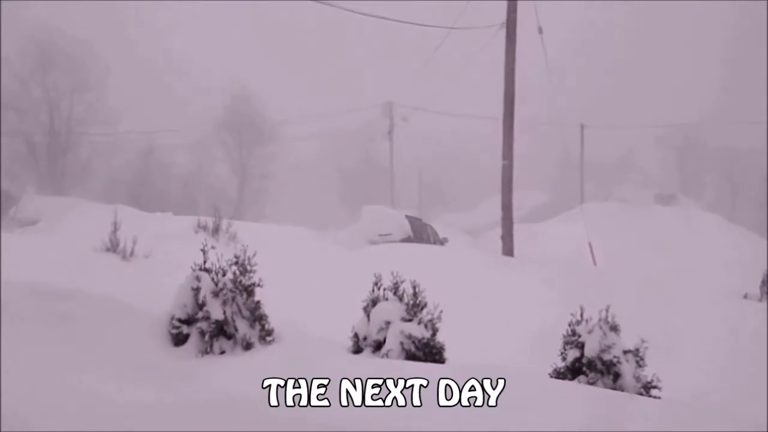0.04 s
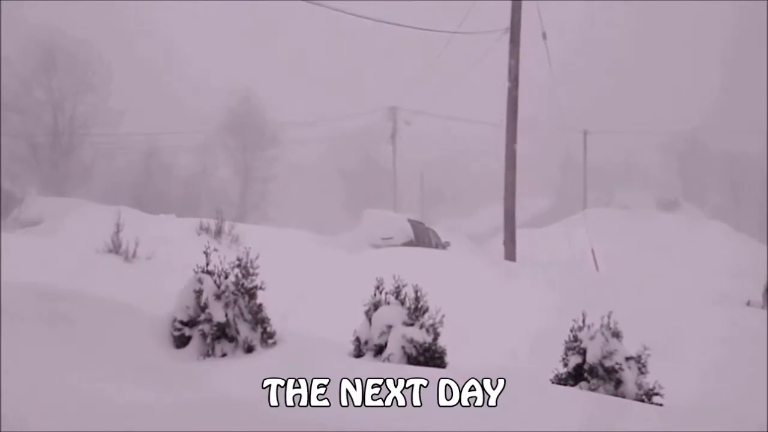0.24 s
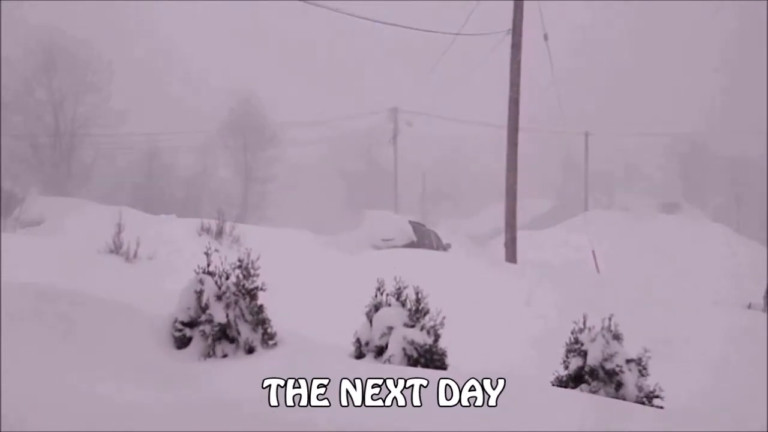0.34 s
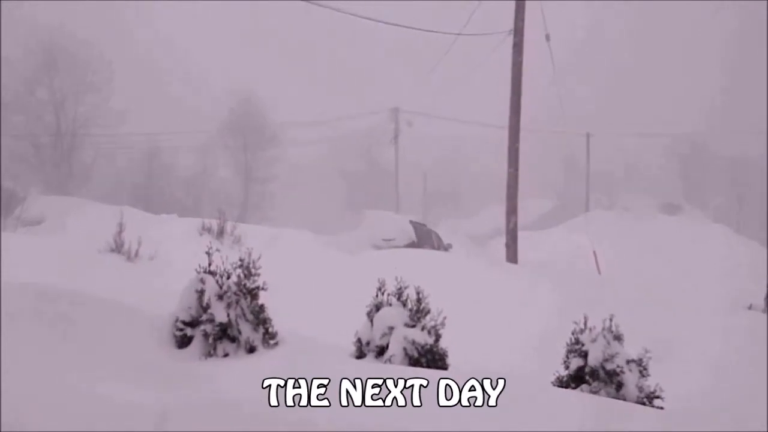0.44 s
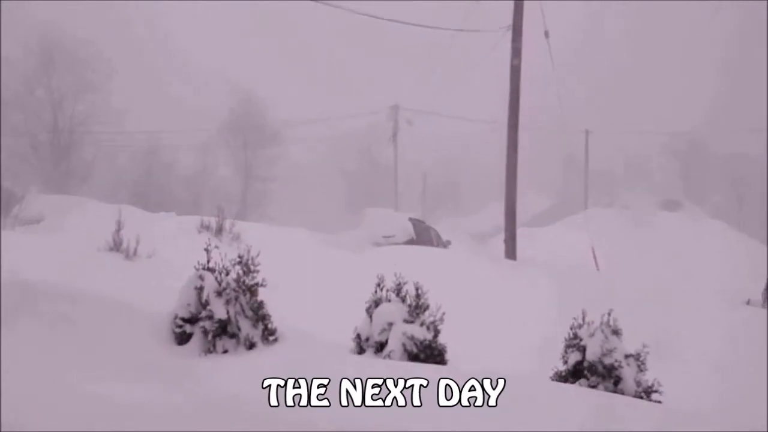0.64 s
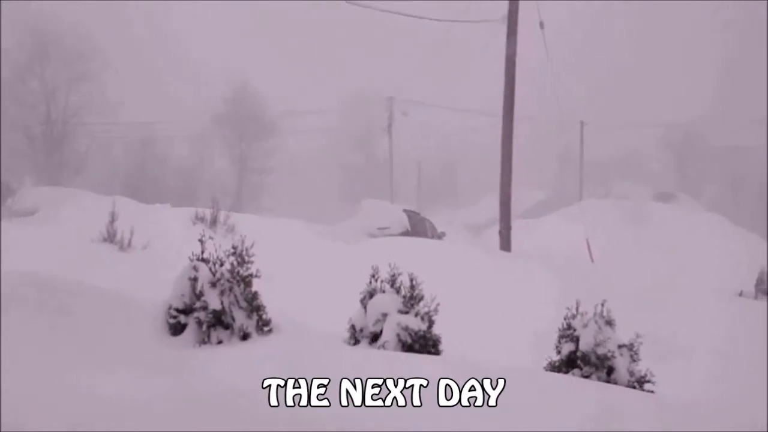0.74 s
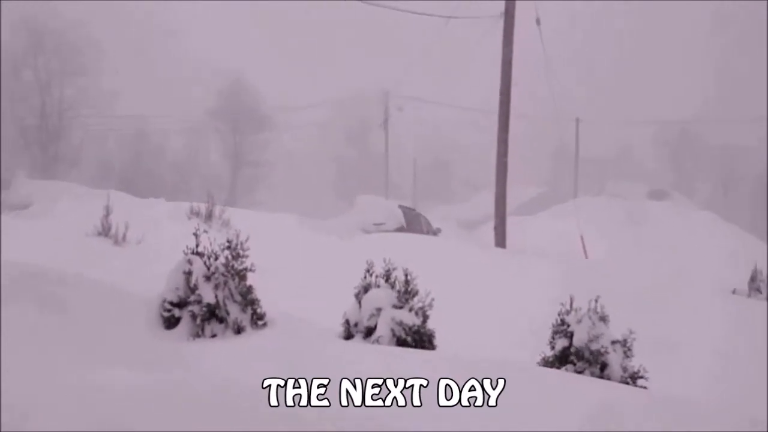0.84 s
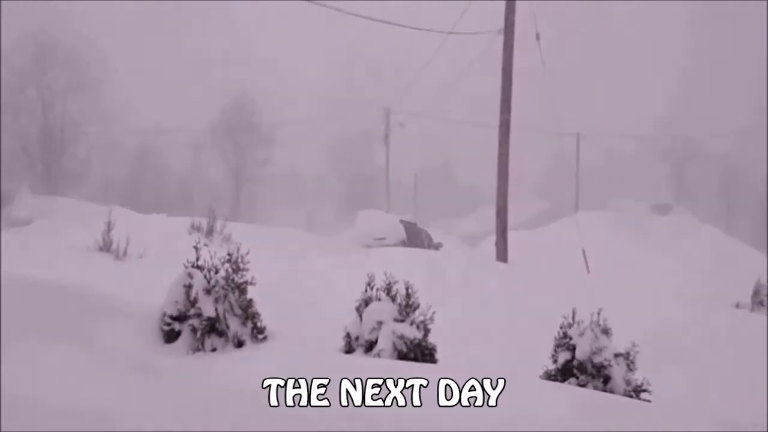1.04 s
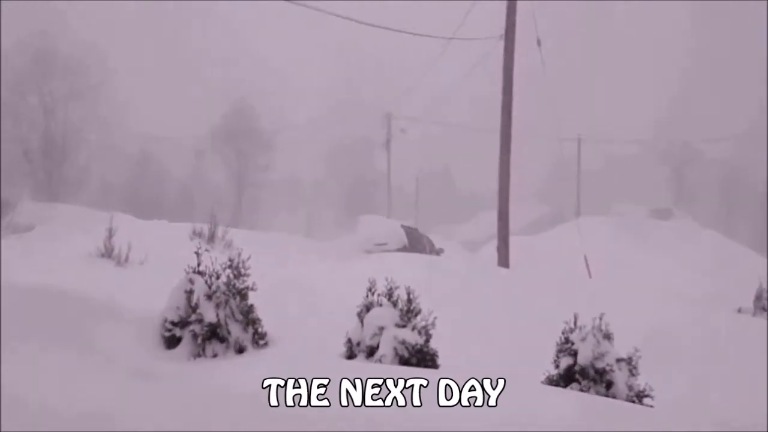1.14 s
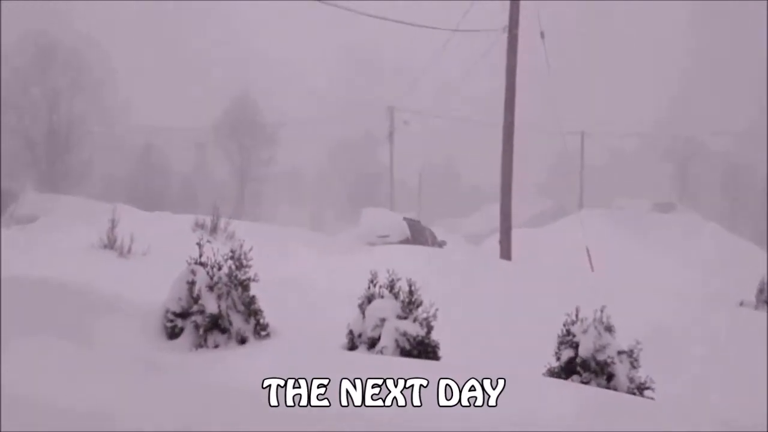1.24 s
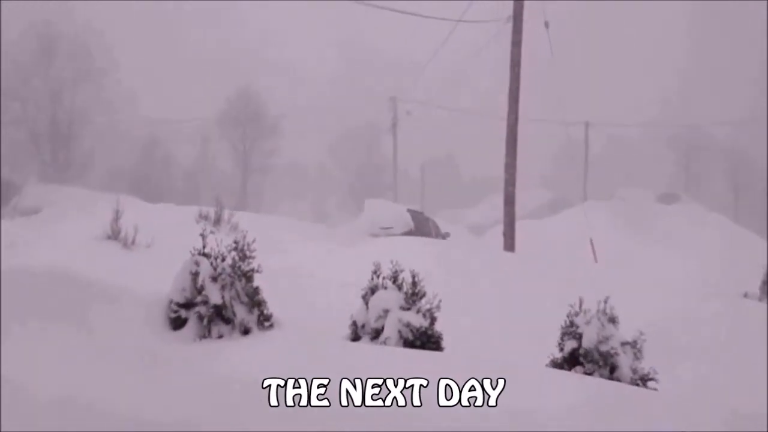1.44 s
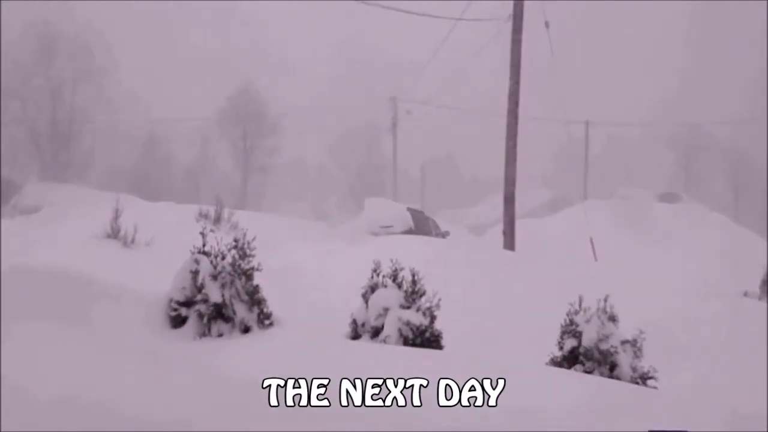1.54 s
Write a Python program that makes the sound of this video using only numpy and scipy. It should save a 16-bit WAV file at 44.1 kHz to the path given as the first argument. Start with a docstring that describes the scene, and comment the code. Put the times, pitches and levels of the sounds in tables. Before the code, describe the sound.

Snowstorm wind hits a bare microphone outdoors: a quiet low rumble, a short burst of heavy thuds, a lull, then a longer, denser battering that fades, with a very faint roar of wind over open snow behind.

```python
"""Snowstorm wind on a bare microphone

Eddies of air press on the diaphragm as dull thuds: short low bumps of pressure with a faint snap.
Smaller eddies, a tumble of random bumps in three sizes, follow the gust between and under them.
Behind them the storm roars over the snow: bands of noise with a thin hiss on top, in a slow swell.
"""
import sys
import numpy as np
from scipy import signal
from scipy.fft import rfft, irfft
from scipy.io import wavfile
from scipy.ndimage import uniform_filter1d

SR = 44100
rng = np.random.default_rng(int(sys.argv[2]) if len(sys.argv) > 2 else 0)


def master_out(mix):
    """Clip the mix to full scale and print it as 16-bit PCM to the path in sys.argv[1]."""
    frames = np.transpose(np.atleast_2d(mix))
    ceiling = np.clip(frames, -1, 1)
    pcm = np.round(ceiling * 32767).astype(np.int16)
    wavfile.write(sys.argv[1], SR, pcm)


def gain_from_db(level_db):
    """Turn a decibel level (scalar or array-like) into a linear amplitude factor."""
    decades = np.asarray(level_db, float) / 20
    return 10 ** decades


N = 68355  # length in samples, 1.55 s


def random_walk(rate_hz):
    """Random levels, rate_hz new ones a second, slewed twice into a smooth drift; spread near 1."""
    hold = int(SR / rate_hz)
    steps = np.repeat(rng.standard_normal(N // hold + 1), hold)
    smooth = uniform_filter1d(uniform_filter1d(steps, hold), hold)
    return 1.3 * smooth[:N]


def noise_band(low_hz, high_hz):
    """White noise shaped by a bell on the pitch scale, centred between two edges."""
    frequency = np.arange(N // 2 + 1) * SR / N
    center_hz = np.sqrt(low_hz * high_hz)
    distance = np.log((frequency + 1) / center_hz) / np.log(high_hz / low_hz)
    return irfft(rfft(rng.standard_normal(N)) * np.exp(-distance ** 2), N)


# Tone of the roar, before its overall level is set: (frequency [Hz], relative level per Hz [dB])
ROAR_SPECTRUM = [(120, -44.5), (200, 3), (376, 1.5), (443, -2), (683, -1), (818, -10.5), (1070, 0.5),
                 (1170, -9), (1290, -6), (5170, -26.5), (15000, -26)]
# Loudness of the roar over time, against its overall level: (time [s], level [dB])
ROAR_LEVEL = [(0, -0.5), (.2, 0), (.29, -3), (.36, 0.5), (.6, 0.5), (.8, 0.5), (.88, 0.5), (1.1, -1),
              (1.24, 0.), (1.28, 1), (1.35, -0.5), (1.44, 2.), (1.49, 0.), (1.55, 3.5)]
ROAR_DB = -51  # overall level
ROAR_SWELL_DB, ROAR_FLICKER_DB = 0.7, 1.36  # random drift: shared by all bands, and each band's own


def roar():
    """The storm over the snow: half-octave noise bands that swell together and flicker alone."""
    spectrum_hz, spectrum_db = np.transpose(ROAR_SPECTRUM)
    level_s, level_db = np.transpose(ROAR_LEVEL)
    swell_db = ROAR_SWELL_DB * random_walk(3.4)
    out = np.zeros(N)
    for hz in 120 * 2 ** np.arange(0, 7.2, .5):
        band_db = np.interp(np.log(hz), np.log(spectrum_hz), spectrum_db)
        flicker_db = ROAR_FLICKER_DB * random_walk(13)
        out += gain_from_db(band_db + swell_db + flicker_db) * noise_band(hz / 1.15, hz * 1.142)
    return out / out.std() * gain_from_db(ROAR_DB + np.interp(np.arange(N) / SR, level_s, level_db))


def add_bump(out, time_s, peak, hz, cycles, phase):
    """Adds one pressure bump: a cosine under a bell that holds the given cycles between its 1/e points."""
    width_s = cycles / hz / 2
    first = max(int((time_s - 4 * width_s) * SR), 0)
    last = min(int((time_s + 4 * width_s) * SR), N)
    i = np.arange(first, last)
    u = i / SR - time_s
    out[i] += peak * np.exp(-(u / width_s) ** 2) * np.cos(2 * np.pi * hz * u + phase)


# Strength of the gust, before the trim of each eddy size:
# (time [s], large eddies [dB rms], small eddies [dB rms], tiny eddies [dB rms])
GUST_LEVELS = [(0.0, -29.5, -44.5, -48.5), (0.138, -32.5, -54, -54.5), (0.188, -30, -44, -49.5),
               (0.22, -28, -39.5, -47), (0.25, -25.5, -41, -49), (0.288, -38.5, -39.5, -54),
               (0.37, -29, -45.5, -51), (0.404, -24, -16, -43.5), (0.482, -18, -25.5, -28.5),
               (0.518, -32.5, -22.5, -50), (0.564, -33, -32, -55), (0.604, -26.5, -27.5, -38.5),
               (0.656, -24.5, -23, -42.5), (0.708, -29.5, -35, -63), (0.738, -31, -19, -25),
               (0.768, -19, -28.5, -46.5), (0.802, -18, -25, -47.5), (0.828, -17, -10, -28.5),
               (0.866, -18.5, -12.5, -24.5), (0.902, -38, -13.5, -29.5), (0.932, -29.5, -18, -27.5),
               (0.962, -18.5, -24.5, -28.5), (0.988, -19, -23, -24.5), (1.01, -26.5, -23, -37),
               (1.122, -27, -30.5, -48), (1.138, -27.5, -41.5, -64), (1.182, -27.5, -19, -32.5),
               (1.204, -20.5, -24.5, -34), (1.226, -23.5, -24, -47), (1.256, -22.5, -24.5, -33),
               (1.282, -30, -34.5, -54), (1.302, -35, -49, -60), (1.416, -38, -45.5, -46.5),
               (1.466, -25, -33, -55), (1.518, -35, -53, -59), (1.55, -28.5, -51, -50)]
# Eddy sizes, one row each: (pitch [Hz], pitch spread [octaves], eddies per second [1/s],
# size scatter [dB], trim against the gust [dB], length of a bump [cycles])
LARGE_EDDIES = (63.5, 0.34, 100, 2.5, -1, 1.43)
SMALL_EDDIES = (148.5, 0.5, 260, 5, -3.5, 0.98)
TINY_EDDIES = (340, 0.38, 400, 4, -5, 1.25)
EDDY_TOP_HZ = 516  # the smallest eddies average out over the diaphragm
EVEN_S = 0.044  # the tumble keeps its strength over this span


def eddies(size, column):
    """A tumble of random bumps, evened out and then given the strength of the gust."""
    hz, octaves, rate, scatter_db, trim_db, cycles = size
    gust = np.array(GUST_LEVELS)
    chance, spread = rng.random((900, 2)), rng.standard_normal((900, 2))
    times = np.cumsum(.3 + 1.4 * chance[:, 0]) / rate - .05  # uneven gaps

    out = np.zeros(N)
    for time_s, (_, turn), (loudness, pitch) in zip(times, chance, spread):
        if time_s < N / SR:
            bump_hz = hz * 2 ** (octaves * np.clip(pitch, -2, 2))
            add_bump(out, time_s, gain_from_db(scatter_db * loudness), bump_hz, cycles, 2 * np.pi * turn)

    out = signal.sosfiltfilt(signal.butter(2, EDDY_TOP_HZ, fs=SR, output="sos"), out)
    span = int(EVEN_S * SR)
    power = uniform_filter1d(uniform_filter1d(out ** 2, span), span)
    even = out / np.sqrt(power + 1e-9)
    gust_db = np.interp(np.arange(N) / SR, gust[:, 0], gust[:, column])
    return even * gain_from_db(trim_db + gust_db)


# Strong thuds: (time [s], bump level [dB peak], pitch [Hz], snap level [dB peak])
STRONG_THUDS = [(.226, -18, 67, -59), (.408, -2, 143, -31.5), (0.443, -3, 89, -32), (.455, -13.5, 120, -50),
                (0.471, -5, 110, -45.5), (.477, -9, 204.4, -36.5), (.491, -18, 91.7, -36),
                (0.509, -7, 115.6, -67), (0.605, -14, 93.7, -38), (0.616, -19, 146, -43),
                (0.644, -17, 109, -56), (.689, -20.5, 100, -59.5), (.726, -14, 167, -58),
                (0.737, -8.5, 170, -33), (.743, -18.5, 280, -45.5), (.76, -10.5, 95, -53),
                (0.776, -14.5, 65, -55), (0.809, -10, 65, -42.5), (0.833, -4.5, 136, -24),
                (0.852, -4, 109.6, -36), (0.867, -5.5, 95.3, -48.5), (.877, -2, 175.7, -30),
                (0.9, -4, 142, -45), (0.928, -7.5, 230, -27.5), (0.934, -6, 170.6, -22.5),
                (0.956, -16.5, 121.8, -33), (0.977, -14, 76, -55), (.986, -7, 155, -26),
                (.997, -12, 92, -58), (1.019, -17.5, 190, -33.5), (1.046, -14.5, 165, -47),
                (1.16, -15, 111, -54), (1.179, -4, 173, -58), (1.184, -7, 168, -37),
                (1.193, -10.5, 197, -32.5), (1.21, -14, 76, -49), (1.253, -16.5, 150, -35),
                (1.265, -12.5, 89, -52), (1.348, -23, 68, -58), (1.463, -25, 116, -60),
                (1.476, -21, 75, -58)]
THUD_CYCLES = 0.83
SNAP_HZ, SNAP_S = 466, 0.002  # snap: a short sharp edge on the thud; middle pitch and length
CRACK_HZ, CRACK_DB = 950, -14.5  # the snap's thin upper edge; level against the snap


def thuds():
    """Each strong eddy pushes or pulls the diaphragm in one low bump and snaps a little."""
    out = np.zeros(N)
    chance = rng.random((len(STRONG_THUDS), 4))
    for (time_s, thud_db, hz, snap_db), c in zip(STRONG_THUDS, chance):
        push_or_pull = np.pi * (c[0] > .5)
        add_bump(out, time_s, gain_from_db(thud_db), hz, THUD_CYCLES, push_or_pull + c[1] - .5)
        snap_hz = SNAP_HZ * 2 ** (0.58 * (c[2] - .5))
        add_bump(out, time_s, gain_from_db(snap_db), snap_hz, SNAP_S * snap_hz, 2 * np.pi * c[3])
        crack_peak = gain_from_db(snap_db + CRACK_DB)
        add_bump(out, time_s, crack_peak, CRACK_HZ, SNAP_S * CRACK_HZ, 2 * np.pi * c[2])
    return out


def scene():
    """The storm behind, the tumbling eddies and the strong thuds on the diaphragm, in one channel."""
    tumble = eddies(LARGE_EDDIES, column=1) + eddies(SMALL_EDDIES, column=2) + eddies(TINY_EDDIES, column=3)
    mix = roar() + tumble + thuds()
    return mix[None]


def band_limit(x):
    """A steep low-pass at the top of the band."""
    return signal.sosfilt(signal.butter(12, 15700, fs=SR, output="sos"), x)


FULL_SCALE = 1.18  # ceiling of the soft rounding
LOW_CUT_HZ, TOP_HZ = 30.6, 15100


def record(dry):
    """The recorder rounds the hardest thuds and cuts the deepest bass and the top."""
    rounded = FULL_SCALE * np.tanh(dry / FULL_SCALE)
    low_cut = signal.butter(2, LOW_CUT_HZ, "high", fs=SR, output="sos")
    top_cut = signal.ellip(8, .2, 30, TOP_HZ, fs=SR, output="sos")
    finished = signal.sosfiltfilt(top_cut, signal.sosfiltfilt(low_cut, rounded))
    return band_limit(finished)


dry = scene()
out = record(dry)
master_out(out)
```